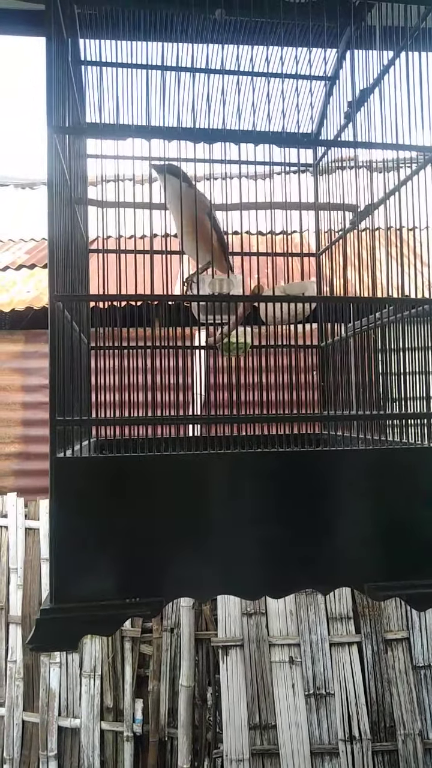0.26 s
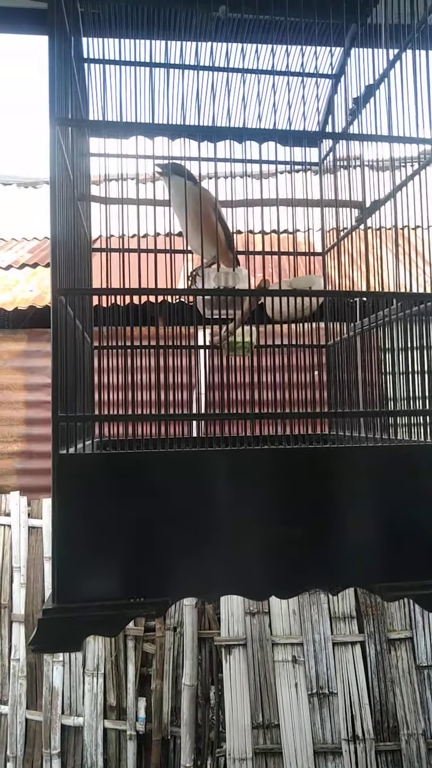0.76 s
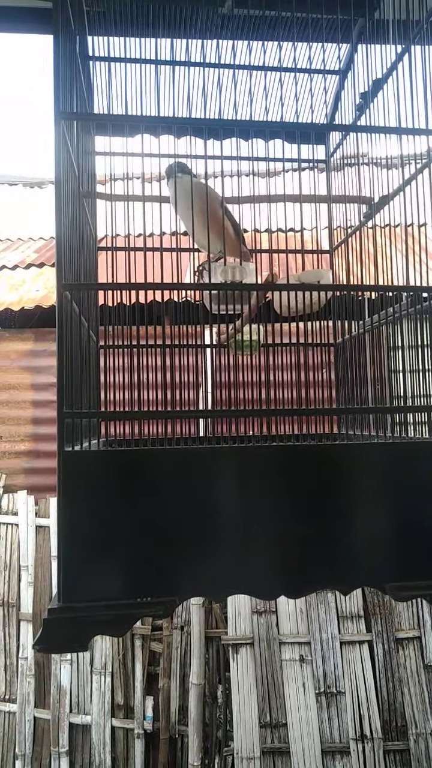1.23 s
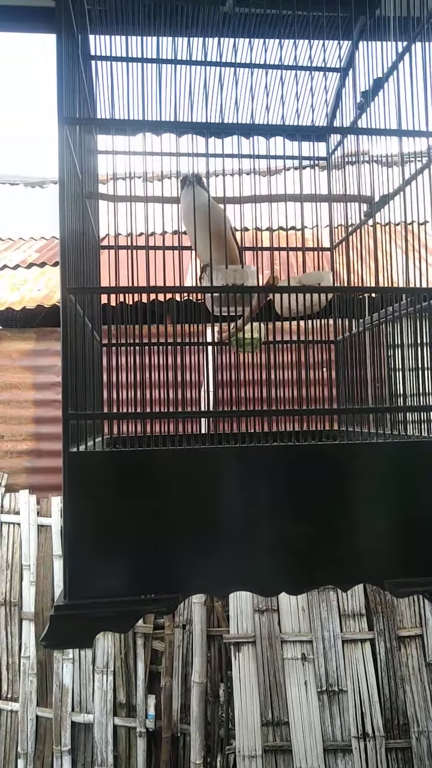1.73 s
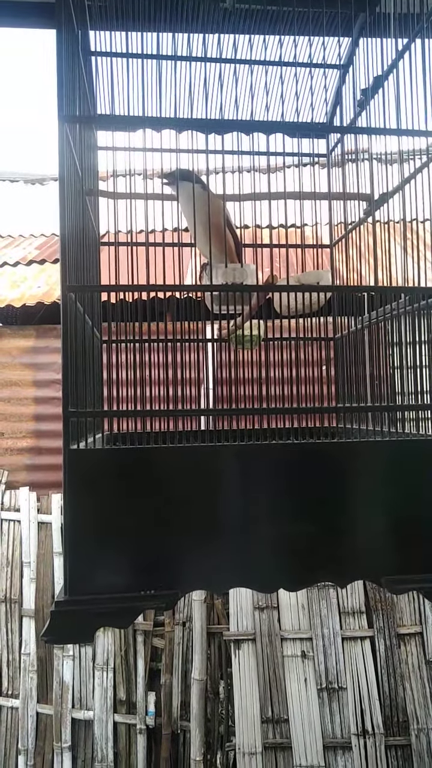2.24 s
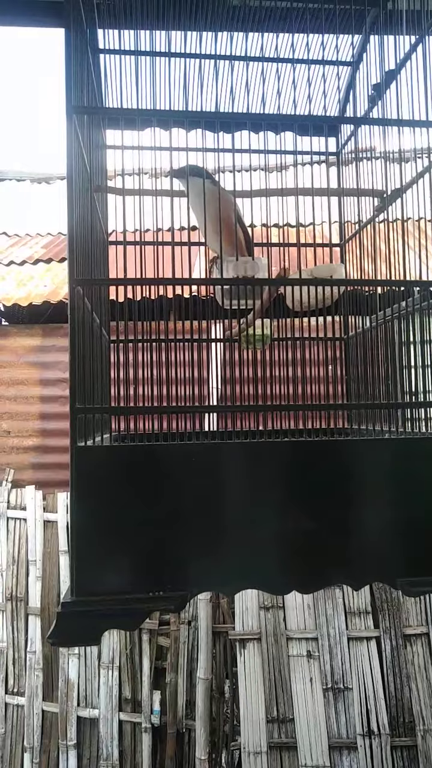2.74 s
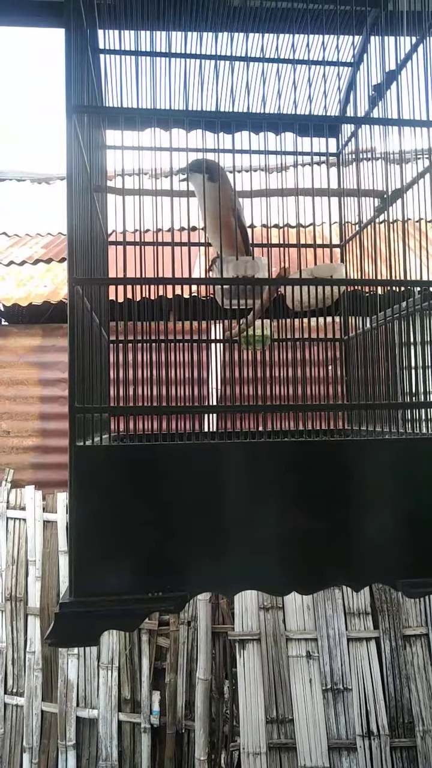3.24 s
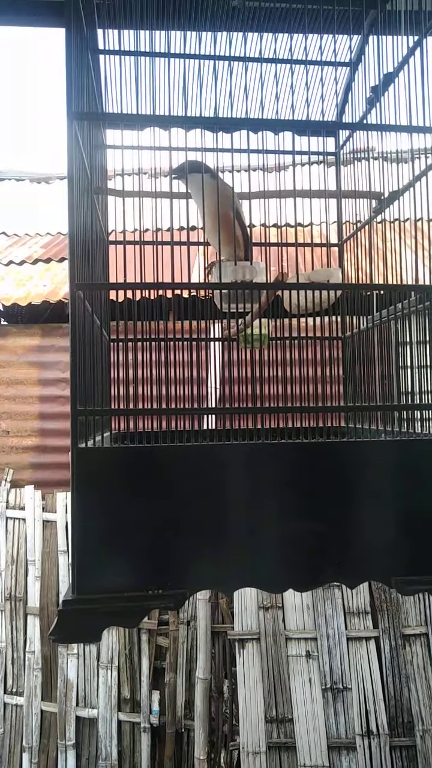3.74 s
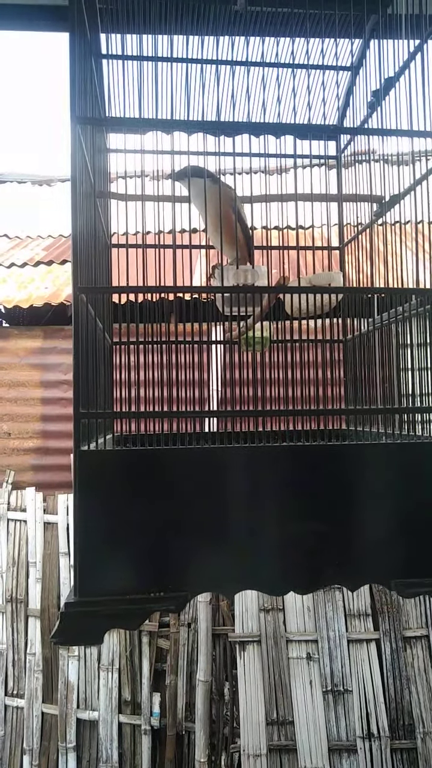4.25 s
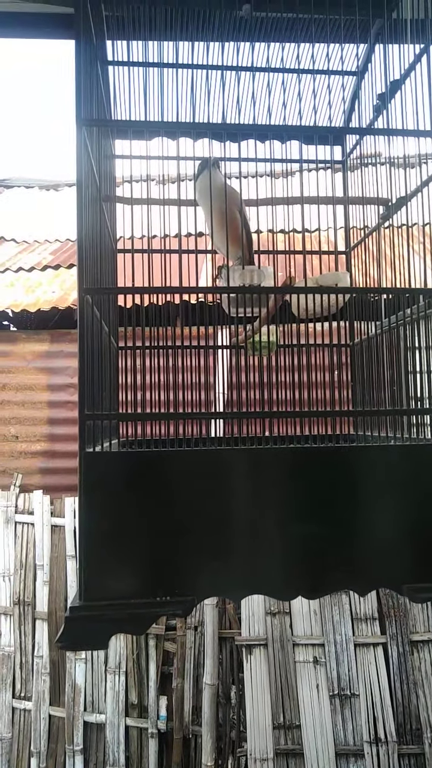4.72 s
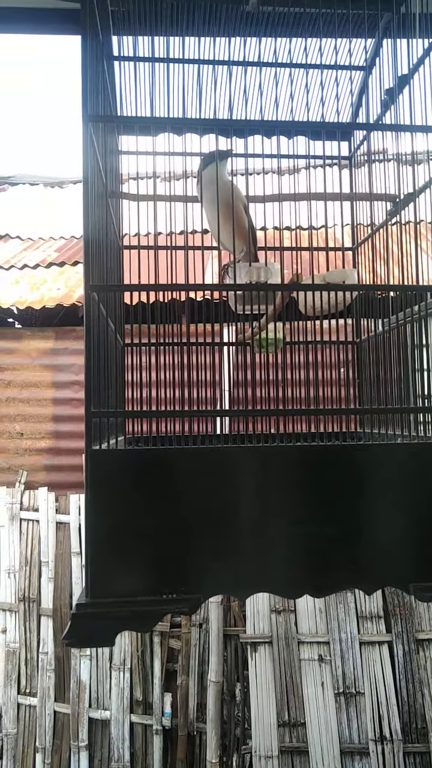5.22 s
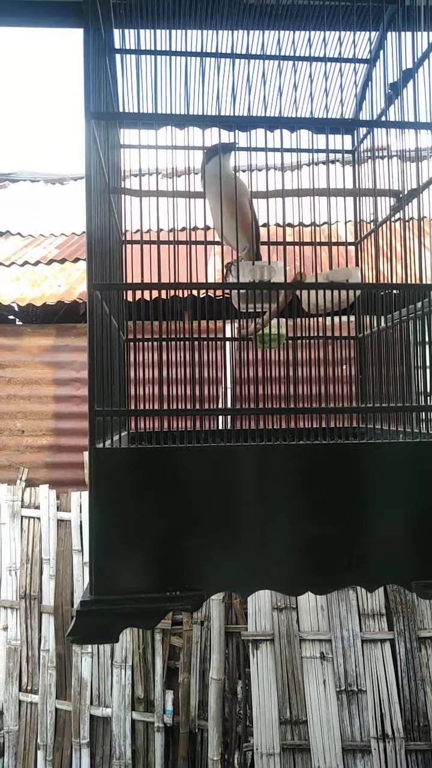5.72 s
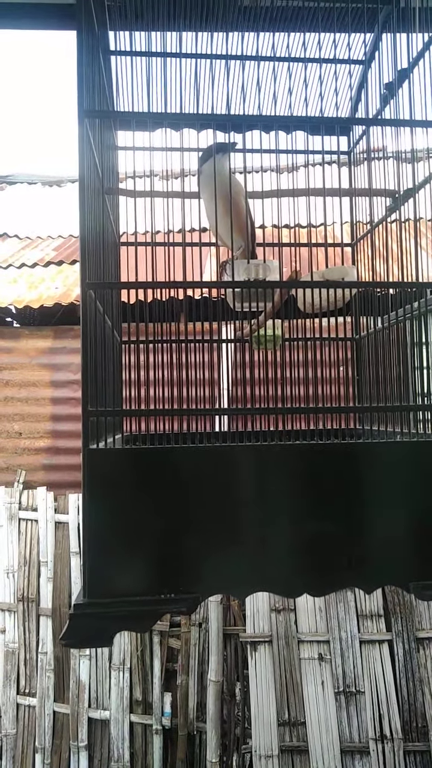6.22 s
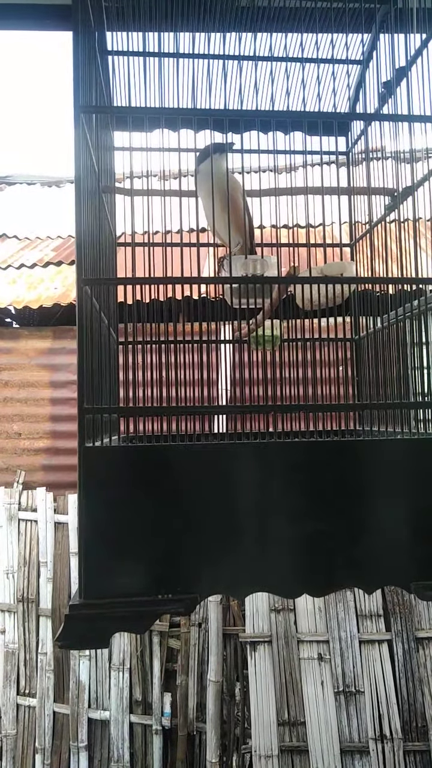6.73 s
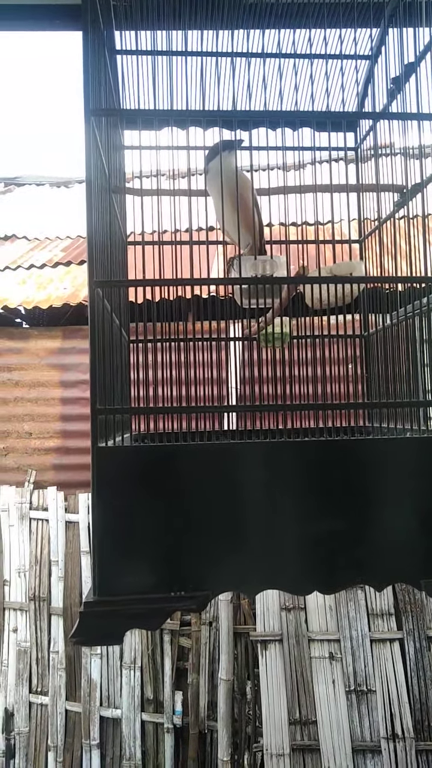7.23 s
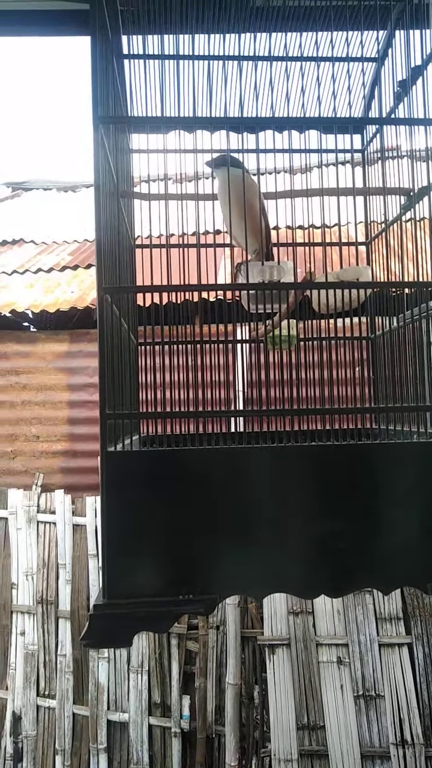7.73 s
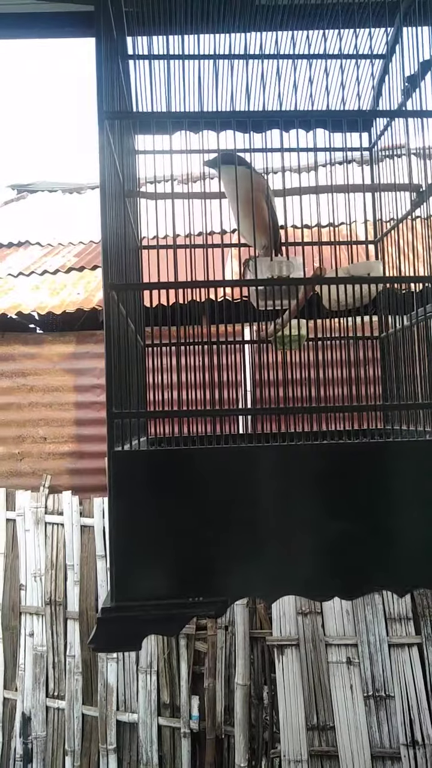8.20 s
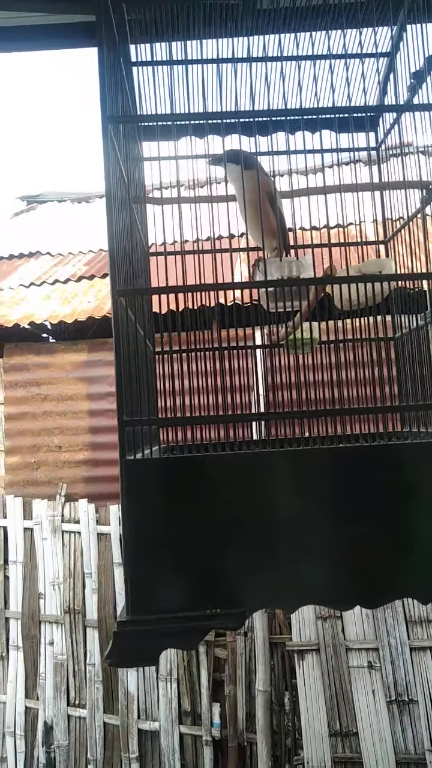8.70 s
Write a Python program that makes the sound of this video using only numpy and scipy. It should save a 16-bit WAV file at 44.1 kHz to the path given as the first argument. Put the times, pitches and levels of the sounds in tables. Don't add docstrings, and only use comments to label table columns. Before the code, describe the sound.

Outdoors in a small echoing yard, a caged bird close by gives a shrill opening whistle, then short phrases of sharp falling chirps and thin two-voiced whistles with pauses between. Midway a second bird farther off takes over with fast, harsh, regular chatter mixed with whistled notes, ending in a long screech. A distant rooster crows at the start, hens cluck faintly, and a low town hum lies beneath. Phone microphone about a metre from the near bird.

```python
import sys
import numpy as np
from scipy import signal
from scipy.fft import rfft, irfft
from scipy.io import wavfile
from scipy.ndimage import uniform_filter1d

SR = 44100
rng = np.random.default_rng(int(sys.argv[2]) if len(sys.argv) > 2 else 0)


def generate_wav(signal):
    frames = np.transpose(np.atleast_2d(signal))
    scaled = np.clip(frames, -1, 1) * 32767
    pcm = np.round(scaled).astype(np.int16)
    wavfile.write(sys.argv[1], SR, pcm)


def volts_from_decibels(level):
    exponent = np.asarray(level, float) / 20
    return 10 ** exponent


N = 395136


def unit(x):
    return x / np.sqrt(np.mean(x ** 2))


def band(x, lo_hz, hi_hz):
    edges_hz = [lo_hz, min(hi_hz, .45 * SR)]
    return signal.sosfilt(signal.butter(2, edges_hz, "band", fs=SR, output="sos"), x)


def steep(x, lo_hz, hi_hz):
    return band(band(x, lo_hz, hi_hz), lo_hz, hi_hz)


def colour(x, points):
    hz, db = np.transpose(points)
    log_hz = np.log(np.fft.rfftfreq(N, 1 / SR) + 1)
    return irfft(rfft(x) * volts_from_decibels(np.interp(log_hz, np.log(hz), db)), N)


def flutter(size, hz):
    k = int(SR / hz) + 1
    smooth = uniform_filter1d(uniform_filter1d(rng.standard_normal(12000 + k), k), k)
    return np.resize(smooth[k:k + size] * np.sqrt(1.5 * k), size)


def add(out, start_s, sound):
    i = int(start_s * SR)
    out[i:i + len(sound)] += sound[:N - i]


def swells(rest_db, rows):
    t = np.arange(N) / SR
    return volts_from_decibels(rest_db) + sum(volts_from_decibels(db) * np.exp(-((t - s) / half) ** 2) for s, half, db in rows)


def tone(hz, db, harmonics_db, rough, flutter_hz=500):
    size = len(hz)
    pitch_shake, swing_shake = flutter(size, flutter_hz), flutter(size, flutter_hz)
    phase = 2 * np.pi * np.cumsum(hz + 0.601 * rough * flutter_hz * pitch_shake) / SR
    dull_db = .19 * SR * uniform_filter1d(np.abs(np.gradient(np.log(hz))), size=60)
    wave = 0
    for k, harmonic_db in enumerate(harmonics_db, 1):
        gain = volts_from_decibels(harmonic_db - dull_db * (k - 1) ** .5)
        wave = wave + gain * np.sin(k * phase + k * k) * (k * hz < .4 * SR)
    from_start = np.arange(size)
    edge = np.minimum(1, np.minimum(from_start, from_start[::-1]) / (.002 * SR))
    return np.sqrt(2) * wave * volts_from_decibels(db) * (1 + rough * swing_shake) * edge


# (f/Hz, reverberation time/s)
YARD_DECAY = [(1000, 0.54), (2500, 0.54), (4500, 0.54), (7000, 0.49), (9300, 0.23), (12000, 0.37)]


def yard(x, wet_db):
    t = np.arange(SR) / SR
    noise = rng.standard_normal(SR) * volts_from_decibels(4.54 * rng.standard_normal(SR))
    tail = sum(band(noise, hz / 1.297, hz * 1.314) * volts_from_decibels(-60 * t / t60) for hz, t60 in YARD_DECAY)
    tail *= 1 - np.exp(-t / 0.00024)
    return x + volts_from_decibels(wet_db) * signal.fftconvolve(x, tail / np.sqrt(np.sum(tail ** 2)))[:N]


# (f/Hz, level/dB per Hz)
TOWN_SPECTRUM = [(250, -34), (400, -55), (800, -37), (1700, -46), (3000, -45), (5000, -44), (8000, -50),
                 (15500, -48)]
# (t/s, level/dB)
RUMBLE_LEVEL = [(0.0, -47), (0.57, -51.5), (3.37, -49.5), (3.54, -44.5), (3.59, -52.5), (3.84, -46.5),
                (3.89, -50.5), (6.36, -50), (6.51, -53), (6.99, -49), (7.04, -50), (7.09, -47.5),
                (8.78, -51.5), (8.88, -54), (8.93, -51), (8.96, -62)]
# (loudest t/s, half length/s, level/dB)
DRONE_SWELLS = [
    (0.541, 0.04, -57),
    (4.593, 0.38, -59.5),
    (5.499, 0.36, -58.5),
    (6.718, 0.4, -51.5),
]
# (loudest t/s, half length/s, level/dB)
TRAFFIC_SWELLS = [
    (0.021, 0.09, -56),
    (.55, 0.06, -56),
    (1.602, 0.13, -53),
    (3.1, 1, -73),
    (4.772, 0.072, -61.5),
    (5.492, 0.13, -62.5),
    (7.3, 0.59, -67),
]
# (start t/s, length/s, low f/Hz, high f/Hz, level/dB)
RUSTLES = [
    (0, 0.32, 383, 750, -53.5),
    (0.073, 0.25, 896, 1180, -56.5),
    (0.547, 0.6, 880, 1286, -59.5),
    (1.368, 0.19, 1000, 2720, -55.5),
    (1.459, 0.16, 226, 710, -53.5),
    (2.32, 0.17, 218, 370, -58),
    (7.011, 0.06, 45, 111, -40),
    (7.683, 0.058, 334, 484.5, -62),
]


def town():
    t = np.arange(N) / SR
    walk_db = -np.interp(t, np.arange(30) / 3, rng.standard_normal(30))
    rumble = volts_from_decibels(np.interp(t, *np.transpose(RUMBLE_LEVEL)) + walk_db)
    drone = swells(-59, DRONE_SWELLS)
    traffic = swells(-65, TRAFFIC_SWELLS)
    noise = rng.standard_normal((5, N))
    floor = colour(band(noise[0], 200, 15500), TOWN_SPECTRUM)
    floor *= volts_from_decibels(-79 - 2.5) / np.std(band(floor, 7000, 15000))
    out = rumble * unit(band(noise[1], 57.4, 103.0))
    out += drone * unit(band(noise[2], 144.7, 159.7))
    out += traffic * unit(band(noise[3], 184.5, 228.4))
    out += floor + volts_from_decibels(-68) * unit(band(noise[3], 18, 40))
    for start, length, lo_hz, hi_hz, db in RUSTLES:
        air = steep(noise[4, int(start * SR):int((start + length) * SR)], lo_hz, hi_hz)
        add(out, start, volts_from_decibels(db) * unit(air) * np.sin(np.linspace(.3, np.pi, len(air))))
    return out


# (t/s, f/Hz, level/dB)
ROOSTER_NOTES = [
    [(0.0, 798, -47), (0.1, 822, -65), (0.2, 848, -44), (.33, 834, -49.5), (.45, 806, -57.5),
     (0.56, 775, -67)],
    [(0.58, 771, -60), (0.7, 786, -52), (.85, 784, -53), (1.0, 777, -58.5), (1.12, 774, -58),
     (1.226, 773.3, -56), (1.36, 735, -61.5), (1.5, 635, -74)],
]
ROOSTER_HARMONICS = [-4.5, 6.5, -38.5]
# (start t/s, length/s, f/Hz, level/dB)
CLEAR_CLUCKS = [(1.71, 0.12, 850, -59), (3.096, 0.38, 943, -61.5), (3.097, 0.87, 508, -63),
                (3.581, 0.404, 678, -56.5), (4.045, 0.12, 960, -62), (4.53, 0.35, 595, -49.5),
                (4.543, 0.24, 1238, -64.5), (5.451, 0.268, 971, -62), (5.61, 0.21, 682, -64.5),
                (6.933, 0.075, 745, -49.5), (7.557, 0.24, 807, -59.5), (8.569, 0.15, 990, -59.5),
                (4.496, 0.22, 1580, -65), (4.9, 0.076, 1500, -63), (4.6, 0.13, 770, -65),
                (5.76, .08, 720, -63.5), (6.32, 0.064, 650, -67), (6.04, .05, 610, -69),
                (3.96, 0.13, 1580, -74), (2.46, 0.14, 610, -65.5), (7.12, .1, 1440, -59),
                (7.45, .25, 1250, -69), (7.49, .15, 1100, -66), (7.93, .1, 920, -68), (8.4, .14, 1400, -68),
                (8.2, 0.28, 1030, -68.5), (8.65, 0.27, 990, -74), (.58, 0.27, 1350, -52.5),
                (1.9, 0.1, 860, -73), (5.8, 0.11, 880, -66), (4.27, .08, 1600, -71),
                (3.42, 0.05, 1250, -68), (2.24, .2, 1230, -66)]
# (start t/s, length/s, f/Hz, level/dB)
HOARSE_SQUAWKS = [(0.54, 0.13, 1250, -50), (8.85, 0.13, 950, -62.5), (3.6, 0.36, 1050, -64.5),
                  (5.6, 0.1, 1320, -64), (0.572, 0.059, 2250, -56), (3.403, 0.3, 930, -55),
                  (2.8, 0.073, 1150, -73.5), (6.45, .3, 1300, -70), (1.3, 0.22, 2250, -64.5),
                  (4.05, 0.079, 793, -60.5), (8.183, 0.051, 1050, -59.5), (.4, 0.22, 616, -68),
                  (.6, 0.4, 1850, -63.5), (1.25, 0.43, 660, -66.5), (2.2, 0.13, 791, -68.5),
                  (2.3, 0.24, 1630, -67), (2.75, 0.093, 1072, -70.5), (4.33, 0.16, 580, -73),
                  (5.3, 0.21, 628, -68), (5.65, 0.22, 1080, -71), (7.85, 0.14, 694, -73),
                  (8.25, 0.23, 1412, -70), (6.3, 0.17, 1370, -70)]
# (start t/s, length/s, f/Hz, level/dB)
SINKING_SQUAWKS = [
    (2.293, 0.41, 1222, -71),
    (4.353, 0.7, 1101, -65),
    (5.114, 0.14, 1086, -59),
    (5.372, 0.18, 596, -60),
    (7.112, 0.28, 1510, -65.5),
    (7.465, 0.23, 1260, -59),
    (8.319, 0.12, 719, -56),
]
# (start t/s, length/s, f/Hz, level/dB)
FAR_WHISTLES = [(0, .07, 2370, -71), (.17, .15, 2550, -75), (.07, .09, 3600, -73), (.58, .28, 3900, -78),
                (.7, .12, 3580, -80), (.98, .2, 2330, -70), (4.87, .1, 3050, -74), (4.33, .14, 2830, -70),
                (4.4, .08, 1950, -80), (4.366, 0.06, 4770, -71), (4.41, .12, 4280, -73)]


def fowl():
    out = np.zeros(N)
    for note in ROOSTER_NOTES:
        s, hz, db = np.transpose(note)
        t = np.arange(s[0], s[-1], 1 / SR)
        crow = tone(np.interp(t, s, hz), np.interp(t, s, db), ROOSTER_HARMONICS, 0.3, flutter_hz=35)
        add(out, s[0], crow)
    murmurs = []
    for when, long, high, loud in rng.random((60, 4)):
        pitch_hz = 420 + (1700 - 420) * high ** 1.5
        murmurs.append((when * N / SR, .06 + .2 * long, pitch_hz, -85 + 4 * (2 * loud - 1)))
    groups = [(CLEAR_CLUCKS + murmurs, 0.299, 0), (FAR_WHISTLES, .33, 0),
              (HOARSE_SQUAWKS, 0.616, 0), (SINKING_SQUAWKS, 0.736, .15)]
    for calls, rough, sink in groups:
        for start, length, pitch_hz, db in calls:
            hz = pitch_hz * np.linspace(1, 1 - sink, int(length * SR))
            arch = np.sin(np.linspace(0, np.pi, len(hz))) ** .5
            swell = arch * volts_from_decibels(2 * flutter(len(hz), 14))
            add(out, start, swell * tone(hz, db, [0], rough, flutter_hz=40 + 260 * rough))
    return out


CHATTER_HZ = 1975


def chatter_pulses(bursts):
    t, hz = np.arange(N) / SR, np.full(N, 1. * CHATTER_HZ)
    for s, db, *_, swell_s in bursts:
        opened = t[int((s - 1.1 * swell_s) * SR):] - s + 0.93 * swell_s
        drop = .5 * min(1, volts_from_decibels(-db - 33)) * np.exp(-opened / .01)
        hz[N - len(opened):] = CHATTER_HZ * (1 + 0.033 * rng.standard_normal() + drop)
    slow = []
    for rate_hz in (60, 150, 500):
        k = SR // rate_hz
        slow.append(unit(uniform_filter1d(uniform_filter1d(rng.standard_normal(N), k), k)))
    patches, wander, throb = slow
    hz *= 1 + .035 * wander
    chance = rng.standard_normal((28000, 2))
    period_count = np.cumsum(1 + .07 * chance[:, 0])
    at = np.interp(period_count, np.cumsum(hz) / SR, np.arange(N))
    keep = at < N - 1
    whole, part = at[keep].astype(int), at[keep] % 1
    size = volts_from_decibels(3 * chance[keep, 1])
    size *= volts_from_decibels(7 * np.abs(patches[whole]) * (-1.) ** np.arange(len(whole)))
    pulses = np.zeros(N)
    pulses[whole] += size * (1 - part)
    pulses[whole + 1] += size * part
    return (unit(pulses) + .25 * rng.standard_normal(N)) * volts_from_decibels(2 * throb)


# (loudest t/s, level/dB, low resonance level/dB, high resonance level/dB, mouth f/Hz)
CHATTER_BURSTS = [(5.111, -42.5, 3.5, -21.5, 3750), (5.232, -31, -4.5, -9, 3900),
                  (5.365, -28.5, -10, -7, 3880), (5.508, -31.5, -10.5, -5.5, 4190),
                  (5.656, -30.5, -11, -6, 4130), (5.811, -33.5, -9.5, -8.5, 4070),
                  (6.019, -39.5, 3.5, -20, 3900), (6.135, -33, -4, -11, 3790),
                  (6.264, -27.5, -10.5, -5.5, 4080), (6.411, -28, -11.5, -6.5, 4380),
                  (6.555, -31, -9, -6, 4100), (6.704, -28.5, -10.5, -6.5, 4500),
                  (6.853, -32.5, -12, -6, 4150), (6.988, -47.5, -11, 0, 4270), (7.112, -36, -6.5, -9, 3700),
                  (7.199, -46.5, -13, -2.5, 4570), (7.255, -45.5, -13, -2.5, 4700),
                  (7.316, -50.5, -12, -1.5, 4530), (7.381, -52.5, -18, -4, 4500),
                  (7.445, -40, 0, -15, 3620), (7.553, -34, -1.5, -12, 3860), (7.676, -31, -14.5, -11, 3500),
                  (7.821, -30.5, -7.5, -9, 3830), (7.962, -33, -7.5, -9, 3920),
                  (8.068, -38, -5.5, -11, 3770), (8.116, -41, -9, -10, 3860), (8.324, -45.5, -11, -7, 4100)]
# (level/dB, swell time/s)
BURST_SWELL = [(-46, .013), (-35.5, .025)]
# (f/Hz, width/Hz, level/dB)
THROAT_RESONANCES = [
    [(1885, 460, 5.5), (2750, 510, 6)],
    [(6050, 940, 3), (7070, 900, -1), (8040, 730, -5), (9120, 1160, -15), (11570, 1290, -10.5),
     (13560, 1160, -21.5)],
]


def chatter():
    t, out = np.arange(N) / SR, np.zeros(N)
    bursts = [(*row, np.interp(row[1], *np.transpose(BURST_SWELL))) for row in CHATTER_BURSTS]
    source = chatter_pulses(bursts)
    low, high = THROAT_RESONANCES
    for s, db, low_db, high_db, mouth_hz, swell_s in bursts:
        gape = 1 + .02 * rng.standard_normal()
        near = slice(int((s - .1) * SR), int((s + 0.16) * SR))
        middle_db = 10 * np.log10(max(1 - volts_from_decibels(2 * low_db) - volts_from_decibels(2 * high_db), .03))
        groups = [(low, low_db), ([(mouth_hz, 1130, 0)], middle_db), (high, high_db)]
        for step, (group, group_db) in enumerate(groups):
            late = t[near] - s - step * .003
            rise, fall = np.abs(late / swell_s) ** 2.33, np.abs(late / 0.031) ** 0.83
            shape = np.exp(-np.where(late < 0, rise, fall))
            ring = 0
            for f, w, f_db in group:
                top_db = .45 * (db + 32.0) * (f > 10000)
                resonance = steep(source[near], gape * f - w / 1.015, gape * f + w / 1.67)
                ring = ring + volts_from_decibels(f_db + top_db) * resonance
            loudness = np.sqrt(np.average(ring ** 2, weights=shape ** 2))
            out[near] += volts_from_decibels(db + group_db) * shape * ring / loudness
    return signal.sosfilt(signal.butter(12, 1620, "high", fs=SR, output="sos"), out)


SHORT_KINDS = { "lead": [([(0, 2330, -18), (.4, 2400, -3.5), (.72, 2500, -0.5), (.82, 2620, -10),
               (.87, 3300, -17), (1, 3500, -18)], [2, -5.5, -6.5, -6.5, -18.5, -13.5], 0.067)],
               "last": [([(0, 2340, -11), (.5, 2410, 3), (.75, 2560, -4), (.82, 2700, -6), (1, 4400, -14)],
               [0, -20, -25], 0.065)], "drop": [([(0, 4320, 0.5), (.12, 4570, -2), (.24, 3930, -10.5),
               (.33, 3360, 2.5), (.5, 2906, -3), (.8, 2790, -6.5), (1, 2780, -12)],
               [-6, -1.5, -9.5, -17, -23], 0.13), ([(0, 4600, -23), (.3, 3905, 0.5), (.5, 3890, -13),
               (1, 4040, -8)], [-2.5, -14, -26.5], 1)], "close": [([(0, 4930, 6), (.25, 3200, -0.5),
               (.5, 3010, 2.5), (1, 2850, -8)], [0, -6, -9], 0.091)], "rise": [([(0, 2780, -5),
               (.12, 2798, -0.5), (.45, 2750, -5.5), (.72, 3050, 4.5), (.85, 3700, 2), (1, 5300, 0)],
               [-1.5, 0, -4, -19, -28.5], 0.2)], "swoop": [([(0, 2665, -6.5), (.4, 2850, -2), (.7, 3120, 6),
               (.85, 3700, 2), (1, 5340, -6)], [-4, -2, -6, -18], 0.2)], "fall": [([(0, 4780, -27.5),
               (.25, 5030, -5), (.62, 3660, -6.5), (.8, 3270, -12), (1, 3090, -25)], [1.7, -3.5, -28],
               0.14), ([(0, 7090, -9), (.25, 6720, -10), (.45, 6050, -6.5), (.75, 6210, -10.5),
               (1, 6280, -14.5)], [0, -10], 0.17)]}
LONG_KINDS = { "long": [([(0, 2650, -17.5), (.15, 3290, 4.5), (.8, 3805, 0.5), (1, 4480, -5)],
              [5, -18, -30, -41], 0.11), ([(0, 4076, 4), (.14, 4580, -4), (.25, 4850, -11.5),
              (.55, 4670, -11), (1, 4850, -18)], [0, -10], 0.26)], "flat": [([(0, 2866, 4),
              (.15, 3136, -1.5), (.6, 3184, 0), (.88, 3320, 3.5), (1, 5030, -1.5)], [6.5, -6.5, -5.5, -19],
              0.134), ([(0, 3770, 13), (.16, 4660, 7.5), (.22, 5480, -7), (.5, 5350, -7), (.7, 5560, -4),
              (.88, 6180, 1.5), (1, 6940, 0)], [0, -14], 0.23)], "twin": [([(0, 2808, -3.5),
              (.2, 3550, 3.5), (.45, 3930, 5.5), (.75, 4417, 3), (.92, 4800, 0), (1, 5060, -2)], [0, -15],
              0.44), ([(0, 3890, 5.5), (.12, 5046, -10), (.2, 5600, -6.5), (.6, 5860, -3.5), (.9, 6050, -3),
              (1, 7060, -12)], [0, -15], 0.43)]}
OPENING_KIND = { "open": [([(0, 2750, -37), (.12, 3300, -14), (.2, 4085, -8.5), (.24, 5120, -26),
                (.35, 5660, -16.5), (.42, 4004, -12.5), (.58, 4060, -12.5), (.75, 4640, -13.5),
                (1, 4650, -30)], [0, -2.6, -15.5], 0.15), ([(.19, 5630, -77), (.21, 5620, -9.5),
                (.26, 6420, -3.5), (.41, 6900, -0.5), (.48, 5510, -13), (.5, 5300, -35)], [0, -11], 0.38)]}
FAR_KINDS = { "peep": [([(0, 1794, -6), (.7, 2257, 4), (1, 3000, -2)], [0], 0.27)],
             "slide": [([(0, 1685, -19), (.2, 1983, -4), (.5, 2490, 1), (.75, 3200, -2), (1, 3460, -3.5)],
             [0, -12.5], 0.7)], "hook": [([(0, 2310, 1.3), (.45, 2934, 8.1), (.75, 2980, 6.5),
             (1, 2567, 2.5)], [0, -21], 0.446)], "coda": [([(0, 3680, 1.4), (.4, 3500, 4.3), (1, 3383, 1)],
             [0], 0.383), ([(0, 2106, -4), (.4, 2080, -1.5), (1, 2025, -8)], [-2, 1, -26, -6], 0.302)],
             "screech": [([(0, 3000, -35), (.17, 3500, -16.5), (.27, 3750, -9.5), (.55, 3910, -10),
             (.9, 3700, -7.5), (1, 3600, -23)], [0, -4, -23], 0.5), ([(0, 3970, -37), (.15, 4150, -16.5),
             (.19, 4450, -13), (.24, 4650, -6.5), (.42, 4700, -3.5), (.9, 4490, -5.5), (1, 4400, -9)],
             [0, -18], 0.428)]}
SYRINX = {**SHORT_KINDS, **LONG_KINDS, **OPENING_KIND, **FAR_KINDS}
NOTE_LENGTH = dict(open=.16, lead=0.03, last=0.03, close=0.029, drop=.03, rise=0.027, swoop=.023, fall=0.021, flat=0.113, long=0.13, twin=.084, peep=0.06, slide=.125, hook=0.051, coda=0.03726, screech=0.31)
# (f/Hz, level/dB)
BEAK_RADIATION = [(1500, -4.5), (2200, -5.5), (4000, -2), (6000, 8.5), (7500, -3.5), (9500, -13.5),
                  (12000, 0.5), (15000, -28.5)]


def sing(songs, breath_db):
    out = np.zeros(N)
    for kind, notes in songs.items():
        share = np.linspace(0, 1, int(NOTE_LENGTH[kind] * SR))
        for start, db, percent, *second_db in notes:
            sides = []
            for path, harmonics_db, rough in SYRINX[kind]:
                at, hz, shape_db = np.transpose(path)
                pitch_hz = np.interp(share, at, hz) * percent / 100
                sides.append(tone(pitch_hz, np.interp(share, at, shape_db), harmonics_db, rough))
            sides[-1] = sides[-1] * volts_from_decibels(sum(second_db))
            note = sum(sides)
            if len(sides) == 2:
                note = note + volts_from_decibels(-13) * band(np.prod(sides, axis=0), 3300, 12000)
            add(out, start, volts_from_decibels(db) * note)
    flow = uniform_filter1d(np.abs(out), int(0.0089 * SR))
    hiss = unit(steep(rng.standard_normal(N), 2120, 11000))
    air = volts_from_decibels(breath_db) * flow * np.abs(flow / flow.max()) ** .8 * hiss
    return colour(out + air, BEAK_RADIATION)


# (start t/s, level/dB, pitch/percent)
FAR_PEEP = [
    (4.125, -44, 101.3),
]
FAR_SLIDE = [
    (4.52, -40, 104.6),
]
FAR_HOOK = [(5.3, -43.5, 95.7), (5.455, -40.5, 100.2), (5.61, -43.5, 95.5), (6.21, -41.5, 96.7),
            (6.36, -39.5, 95.8), (6.5, -42.5, 92.8), (6.655, -41.5, 100.3), (7.76, -43.5, 93.5),
            (7.91, -45, 100), (8.372, -46.5, 92.6)]
FAR_CODA = [(5.756, -35.5, 101.6), (5.8, -36, 102.7), (6.792, -37, 99.9), (6.84, -38.5, 99.3),
            (7.05, -38.5, 98.1), (7.1, -41, 98.4), (8.048, -35, 102), (8.1, -37.5, 98.5),
            (8.308, -45.5, 99)]
FAR_SCREECH = [
    (8.4, -29, 99.5),
]


def far_bird():
    songs = dict(peep=FAR_PEEP, slide=FAR_SLIDE, hook=FAR_HOOK, coda=FAR_CODA, screech=FAR_SCREECH)
    return sing(songs, breath_db=-20) + chatter()


# (start t/s, level/dB, pitch/percent)
OPEN_NOTE = [
    (.12, -21.5, 101.2),
]
LEAD_NOTES = [
    (.857, -30.5, 102.2),
    (1.119, -28, 102.3),
    (2.136, -27, 100.3),
    (3.033, -27.5, 98),
    (3.309, -30.5, 101),
]
LAST_NOTE = [
    (8.569, -32, 101.8),
]
CLOSE_NOTE = [
    (8.621, -28, 99.5),
]
RISE_NOTE = [
    (2.279, -30, 101),
]
SWOOP_NOTES = [
    (1.271, -30, 96),
    (3.468, -32.5, 101.9),
]
FLAT_NOTE = [
    (1.404, -40.5, 100.6),
]
LONG_WHISTLES = [
    (2.484, -31.5, 101.1),
    (3.691, -31, 100.8),
]
# (start t/s, level/dB, pitch/percent, second side level/dB)
DROP_NOTES = [
    (0.905, -20.5, 101.7, -7.5),
    (1.167, -20.5, 101.2, -2),
    (2.184, -17.5, 101.2, -4.5),
    (3.083, -17.5, 101.1, -5.5),
    (3.356, -21.5, 102.2, 1.5),
]
FALL_NOTES = [
    (1.313, -25.5, 100.4, 0),
    (2.319, -25, 100.9, 0.0014),
    (3.51, -27.5, 104.5, 0.00098),
]
TWIN_NOTES = [
    (1.567, -35.5, 101.8, 1),
    (1.708, -35.5, 99.7, 0),
    (1.882, -36, 100.5, 0),
    (2.685, -36, 98.7, -5),
    (3.885, -35.5, 99.1, -2.5),
]


def caged_shrike():
    songs = dict(open=OPEN_NOTE, lead=LEAD_NOTES, last=LAST_NOTE, close=CLOSE_NOTE, drop=DROP_NOTES,
                 rise=RISE_NOTE, swoop=SWOOP_NOTES, fall=FALL_NOTES, flat=FLAT_NOTE,
                 long=LONG_WHISTLES, twin=TWIN_NOTES)
    return sing(songs, breath_db=-15)


def scene():
    background = town() + yard(fowl(), 0)
    return (background + yard(far_bird(), -5) + yard(caged_shrike(), -9))[None]


def roll_off(x):
    return signal.sosfilt(signal.butter(12, 15700, fs=SR, output="sos"), x)


def record(dry):
    top = signal.butter(12, 15450, fs=SR, output="sos")
    return roll_off(signal.sosfilt(top, dry))


dry = scene()
out = record(dry)
generate_wav(out)
```